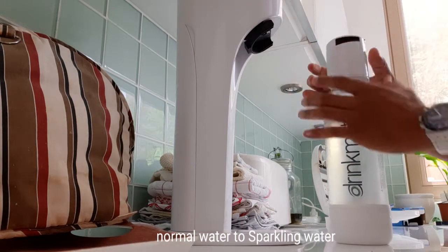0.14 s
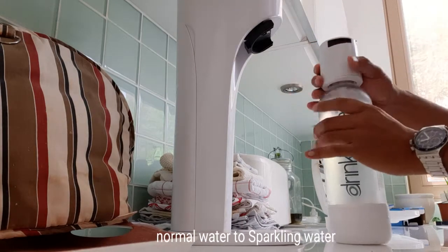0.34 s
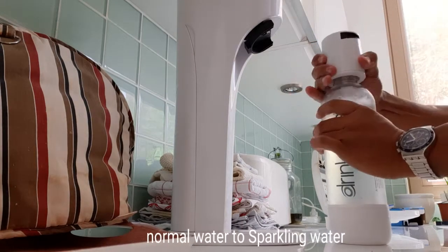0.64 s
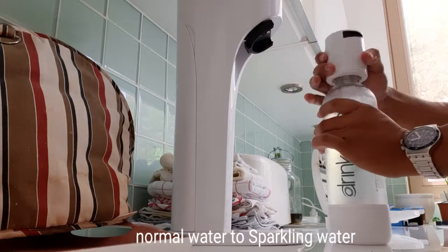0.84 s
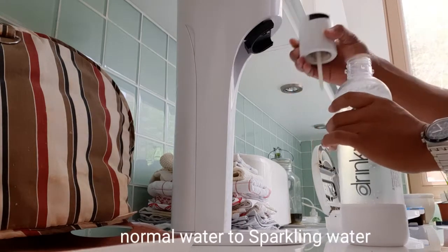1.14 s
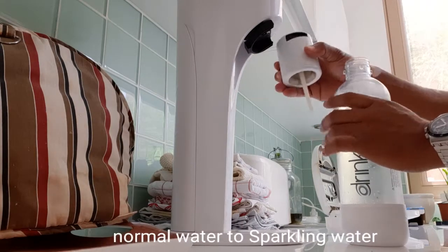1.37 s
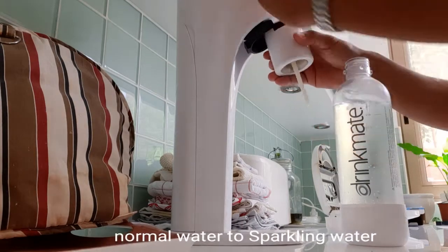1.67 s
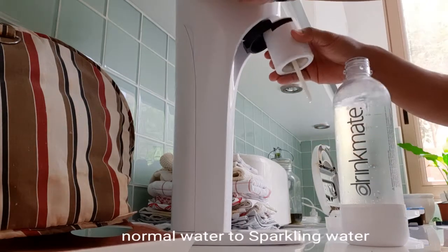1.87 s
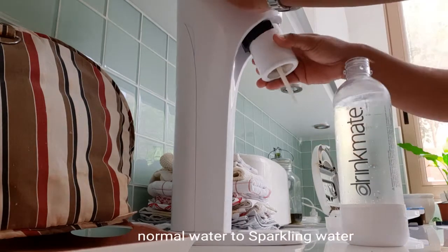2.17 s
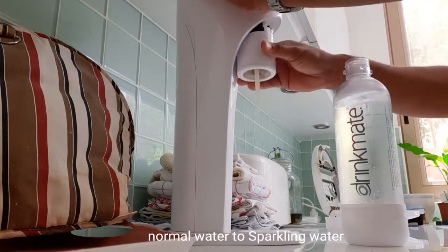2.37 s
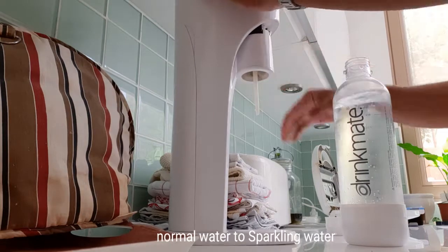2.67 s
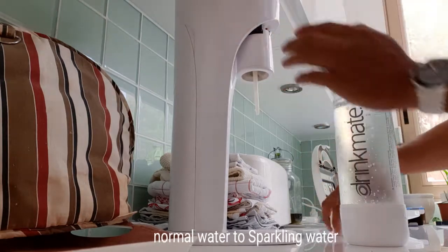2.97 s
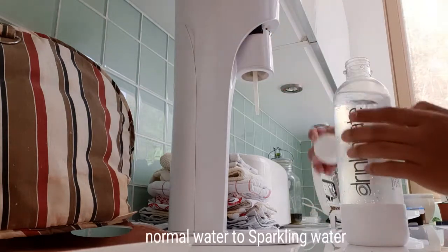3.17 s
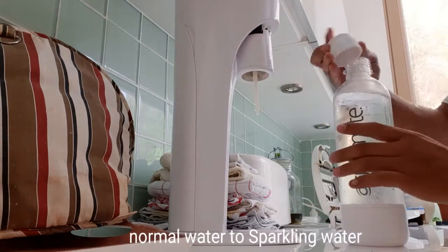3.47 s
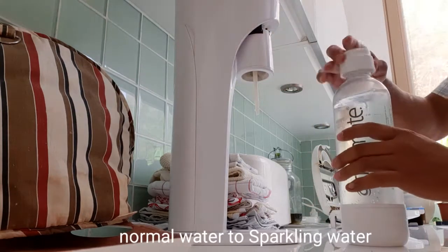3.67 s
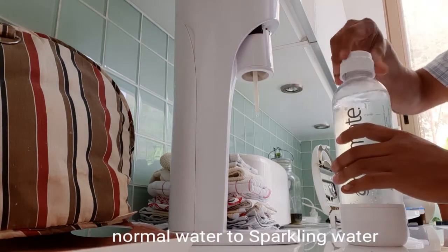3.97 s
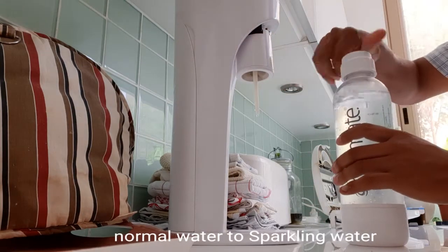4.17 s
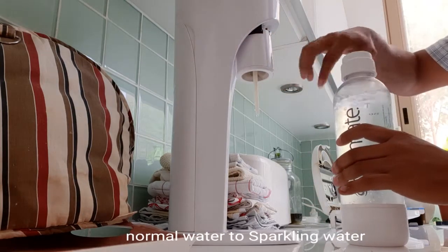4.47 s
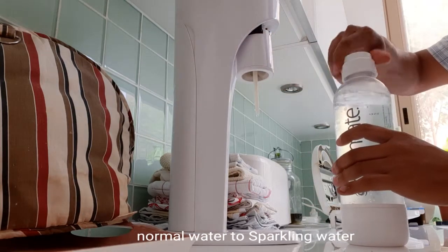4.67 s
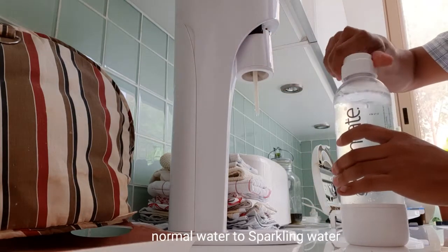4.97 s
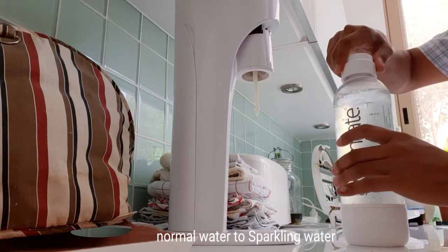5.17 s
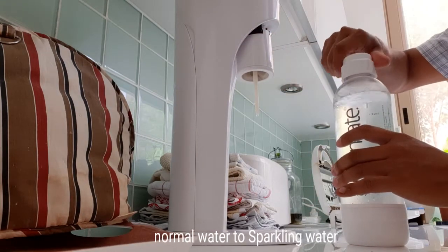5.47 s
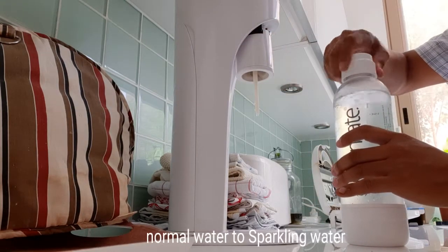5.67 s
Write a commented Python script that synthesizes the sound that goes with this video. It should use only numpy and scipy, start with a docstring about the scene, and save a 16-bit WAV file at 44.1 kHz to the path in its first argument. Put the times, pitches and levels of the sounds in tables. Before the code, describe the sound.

A bottle is uncoupled from a soda maker: fading hiss, light clicks, tiny burst of gas. Plastic taps and a gritty slide lead to two hard clacks with a short hollow boom. A hand softly brushes the bottle, then the cap clatters on and tightens in repeated rasping, clicking twists, with dull thumps and faint fizz ticks. Close pickup, lively hard-walled kitchen echo, low quiet room murmur.

```python
"""A soda maker in a tiled kitchen: first the hiss of vented gas (coloured noise) dies away.
The plastic infuser head knocks (short noise bursts ringing resonances) and leaves the bottle with a puff.
Fingers shift, then the head slides into its mount (gritty noise) and latches with two loud clacks.
A hand brushes the bottle; a cap rattles onto the neck, whose hollow note falls, and is screwed down
in short turns while the bottle thumps on the counter. Bubbles tick; a low murmur and echo surround all."""
import sys
import numpy as np
from scipy import signal
from scipy.fft import rfft, irfft
from scipy.io import wavfile
from scipy.ndimage import uniform_filter1d

SR = 44100
rng = np.random.default_rng(int(sys.argv[2]) if len(sys.argv) > 2 else 0)


def unload_audio(sound):
    """Save the sound as a 16-bit wav file, at the path given as the first command line argument."""
    columns = np.transpose(np.atleast_2d(sound))
    # keep every value between -1 and 1, then stretch to whole-number steps
    steps = np.round(np.clip(columns, -1, 1) * 32767)
    wavfile.write(sys.argv[1], SR, steps.astype(np.int16))


N = 256652  # length in samples
TAPS = 8192  # length of one short sound in samples

# steady murmur of the house: pitch_hz, level_db
AMBIENCE_COLOUR = [(15, -47.5), (25, -22.5), (64, -17.5), (82, -9), (127, -1.5), (180, -12.5), (206, -20.5),
                   (354, -9), (427, -18), (560, -10.5), (714, -16), (1190, -29.5), (1290, -27), (3340, -43),
                   (16000, -39)]
# how alike its two channels are: pitch_hz, likeness (-1 to 1)
AMBIENCE_SAME = [(60, 1), (180, 0.69), (550, 0.8), (1650, -0.5), (4970, -0.54), (15000, -0.32)]
# its left-right difference: pitch_hz, left_over_right_db
AMBIENCE_BALANCE = [(60, -22), (180, -6), (550, -6), (1650, -4), (4970, -3), (15000, -1)]
AMBIENCE_DB = -53

# time for the kitchen's echo to fall by 60 dB: pitch_hz, fall_time_s
KITCHEN_T60 = [(100, 0.5), (260, 1), (700, 0.75), (1800, 0.5665), (4800, 0.67), (13000, 0.41)]
# strength of the echo: pitch_hz, level_db
KITCHEN_DB = [(100, -6.5), (300, -5.5), (800, -3.5), (2000, -6), (5000, -2.5), (13000, -6.5)]

# soft blows that reach the counter: start_s, level_db, pitch_hz
THUMPS = [(.148, -35.5, 121), (0.251, -39.5, 98.5), (.296, -43, 85), (0.568, -22, 150), (0.577, -20, 134.4),
          (1.027, -28, 121), (1.519, -30.5, 112), (1.683, -24, 159), (1.74, -43, 87), (1.959, -36.5, 138),
          (2.028, -31.5, 124), (2.142, -43, 140), (2.348, -26.5, 118), (2.548, -33, 113), (2.939, -46, 130),
          (3.656, -32, 130), (3.877, -24, 117), (4.016, -27, 137), (4.095, -26.5, 106),
          (4.16, -25.5, 114.5), (4.348, -25.5, 109.5), (4.637, -31, 110), (4.706, -32, 108),
          (4.912, -28, 109), (4.969, -34, 119.6), (5.181, -33.5, 142), (5.239, -33, 115),
          (5.668, -34.5, 118)]
THUMP_DECAY_S = 0.013

# bubbles bursting at the neck: start_s, level_db
BUBBLES = [(2.616, -50), (2.831, -55), (2.974, -53.5), (3.865, -47.5), (4.223, -47), (4.448, -50.5),
           (4.867, -51.5), (5.086, -51), (5.203, -39.5), (5.332, -48), (5.496, -48), (5.572, -49)]

# fingers shifting on the plastic: start_s, hold_s, level_db
GRIPS = [(.75, 0.12, -63), (1.05, 0.0028, -45), (1.16, .02, -52.5), (1.4, 0.041, -67), (2.95, 0.034, -69)]
# tone of the fingers: pitch_hz, level_db
FINGERS_COLOUR = [(240, -52), (400, -15), (444, 6), (531, -7.5), (1120, -12), (1400, -14.5), (2280, -17),
                  (3410, -19), (14000, -34.5)]

# pushes of the head along its mount: start_s, hold_s, level_db
SLIDES = [(1.665, 0.024, -38), (1.8, 0.022, -50), (2.01, 0.12, -37.5)]
# tone of the slide: pitch_hz, level_db
SLIDE_COLOUR = [(88, -25), (150, -6), (201, -9.5), (649, -2), (871, -13), (1420, -13), (2060, -24.5),
                (3920, -32.5), (4860, -29.5), (11900, -36), (16000, -39)]
# the mount's thin rasp, its level relative to the slide
SQUEAK_HZ, SQUEAK_WIDTH_HZ, SQUEAK_DB = 3900, 200, -18.5

# strokes of the cap on the thread: start_s, hold_s, level_db
TURNS = [(3.605, 0.13, -49.5), (3.89, 0.013, -45.5), (4.02, 0.13, -48), (4.37, 0.025, -48),
         (4.6, .11, -50.5), (4.905, 0.074, -52), (5.15, 0.092, -47.5), (5.44, 0.037, -50),
         (5.68, 0.096, -55.5)]
# tone of the thread: pitch_hz, level_db
THREAD_COLOUR = [(240, -98), (400, -2.5), (935, -4.5), (1270, -15), (1440, -9), (2050, -13), (2930, -19),
                 (3580, -21.5), (4310, -19), (4800, -40), (7400, -29.5), (8240, -25), (9760, -33.5),
                 (13700, -24.5), (16000, -61)]
TURN_TIGHTENS_DB_PER_S = 35  # each turn grows louder while it holds

# a hand brushing along the bottle: start_s, hold_s, level_db
BRUSHES = [(3.39, 0.178, -70.5)]
# tone of the brushing: pitch_hz, level_db
BRUSH_COLOUR = [(880, -23), (1500, -6), (1680, -2), (2620, -12), (3640, -8.5), (5950, -10.5), (15000, -28)]

# tone of gas leaving the relief valve: pitch_hz, level_db
VENT_COLOUR = [(530, -5.5), (900, 0.5), (1110, -5.5), (1560, -5), (1660, 0.5), (2080, 7), (2970, -3),
               (3760, 4.5), (4970, 0.5), (7860, -2.5), (10200, -10.5), (11600, -6), (13000, -29)]
VENT_DB, VENT_FADE_DB_PER_S = -42, 105  # dies away as the pressure drops
# spurts of the last pressure as the seal lets go: start_s, hold_s, level_db
SPURTS = [(.553, .001, -43), (.568, 0.0029, -21.5), (.58, 0.008, -20)]
# tone of the puff: pitch_hz, level_db
PUFF_COLOUR = [(120, -33), (200, -13), (465, -1.5), (722, -1), (867, -8.5), (1420, -7.5), (1680, -17),
               (1940, -6), (3190, -13.5), (4600, -13.5), (5330, -14), (12400, -12.5), (16000, -15)]

# pushes of the cap that sound the air in the neck: start_s, hold_s, level_db
NECK_PUSHES = [(3.605, 0.0078, -27), (3.662, 0.048, -26), (3.76, .035, -42), (3.898, 0.0015, -31.5)]
# the air in the neck drops in pitch as the cap comes down over it
NECK_OPEN_HZ, NECK_SHUT_HZ = 447.7, 314.3
CAP_LANDS_S, CAP_CLOSING_S, CLOSING_POWER = 3.6, .113, 2.18

# the machine's hollow column booming as the head lands, and a thin ring as the cap seats:
# start_s, pitch_hz, level_db, fall_time_s (time to fall by 60 dB)
PINGS = [(2.153, 295, -14.5, 0.062), (2.154, 359.4, -19.5, 0.12), (4.019, 3650, -50, 0.52),
         (4.019, 3620, -41, .4), (4.019, 3680, -46, 0.53)]

# infuser head on bottle and machine: start_s, level_db, strongest_pitch_hz,
# treble_fall_db_per_octave, decay_s, left_over_right_db
HEAD_KNOCKS = [(.358, -55.5, 2500, 1.2, .005, 3), (.434, -47, 1500, 3.5, .012, 0.5),
               (.474, -36.5, 2170, 8.5, .0025, -2), (.517, -39, 2380, 1.7, .0023, -2),
               (1.002, -32.5, 3450, 9, .007, -2), (1.034, -40, 1045, 13, .007, -3),
               (1.16, -42, 1090, 11.5, .005, -3), (1.25, -39, 440, 11.5, .006, -3.5),
               (1.522, -24.5, 490, 7.5, .004, -5), (1.53, -21, 541, 8, .004, -3),
               (1.548, -34, 903, 5.5, .011, -2), (1.666, -19.5, 719, 8.5, .004, 0.5),
               (1.689, -14.5, 740, 13, .006, -6), (1.706, -34.5, 500, 2.5, .005, 4),
               (2.005, -31, 392.4, 4, .007, 5.5), (2.072, -36, 1000, 0.8, .0054, -0.5),
               (2.146, -10, 593, 4, .0035, 1), (2.152, -10.5, 670, 7, .0027, -10.5),
               (2.342, -9.5, 1160, 5.5, .003, -3), (2.55, -37, 380, 5.5, .004, 1)]
# what the head and the machine ring with: pitch_hz, width_hz, level_db (over the plain click)
HEAD_MODES = [(205, 40, 12), (305, 50, 15), (355, 30, 15), (425, 40, 11), (733, 22, 7), (850, 40, 3),
              (1044, 50, 10), (1137, 50, 8), (1450, 80, 7), (1620, 55, 9), (1989, 45, 8), (2288, 70, 7),
              (2700, 90, 5), (3068, 90, 8), (3524, 55, 7), (3864, 50, 6), (4310, 70, 4)]
# cap on the bottle neck and its thread: start_s, level_db, strongest_pitch_hz,
# treble_fall_db_per_octave, decay_s, left_over_right_db
CAP_CLICKS = [(3.602, -19, 1630, 12.5, 0.0023, -9), (3.626, -22, 1600, 10, 0.016, 13.5),
              (3.641, -21.5, 1400, 8, 0.0061, -5.5), (3.656, -23, 1200, 11, .004, -13),
              (3.677, -19, 1300, 12, 0.0048, 2.5), (3.703, -15.5, 1300, 9.5, 0.011, -3),
              (3.88, -30.5, 1120, 9, 0.0041, -2), (3.892, -23, 930, 13, 0.0028, -2),
              (4.016, -17, 480, 5, 0.0016, -2.5), (4.021, -26.5, 900, 15, 0.0046, -16),
              (4.103, -23.5, 820, 7.5, .004, -6), (4.345, -34.5, 990, 9.7, 0.005, -4),
              (4.374, -23.5, 700, 10, 0.011, -3.5), (4.604, -24, 670, 8, 0.0042, -6),
              (4.636, -27, 910, 9.5, 0.0035, -3), (4.684, -26.5, 700, 8, 0.0055, -2),
              (4.696, -32, 404, 3.5, 0.0057, -3), (4.905, -27, 780, 8.5, 0.0049, -4),
              (5.14, -33, 480, 7.5, 0.0056, -6.5), (5.167, -25.5, 1295, 9, 0.0063, -3.5),
              (5.212, -21.5, 890, 10, 0.0043, -2), (5.418, -32, 453, 7.5, 0.0071, -6),
              (5.437, -31, 370, 6.5, 0.024, -5), (5.491, -33.5, 450, 3.5, 0.0051, -3.5),
              (5.664, -29.5, 636, 5, 0.0079, -2)]
# what the capped bottle rings with: pitch_hz, width_hz, level_db (over the plain click)
BOTTLE_MODES = [(578.3, 19.6, 9), (916, 20, 9), (1436, 90, 8.5), (1664, 51, 15), (1744, 84, 6),
                (2606, 310, 9.5), (2830, 50, 7.5), (3370, 94, 12), (3830, 57, 4), (4086, 59, 6),
                (6160, 81, 3.5)]
# middles of the bands in which a contact's level is set: pitch_hz
BAND_HZ = [380, 1300, 4200, 10500]
BASS_FALL_DB_PER_OCTAVE = 5  # how a contact weakens below its strongest pitch
BLOW_S = .006  # a contact's level is its rms over this time

EDGE_HZ = 15950  # upper limit of the final sound


def amp(db):
    """Decibels to gain."""
    return 10 ** (np.asarray(db) / 20)


def unit(x):
    """Scales to an rms of one."""
    return x / np.sqrt(np.mean(abs(x) ** 2) + 1e-20)


def read(points, hz):
    """Reads a curve joined by straight lines over log frequency."""
    f, value = np.transpose(points)
    return np.interp(np.log(hz + 1), np.log(f + 1), value)


def add(mix, s, sound):
    """Mixes a stereo sound in at time s."""
    part = mix[:, max(round(s * SR), 0):][:, :sound.shape[1]]
    part += sound[:, :part.shape[1]]


def sides(pan_db):
    """Left and right gains for a level difference; positive is louder on the left."""
    return amp(np.array([[.5], [-.5]]) * pan_db)


def causal(gain):
    """The minimum-phase response with this magnitude, so that its energy comes as early as it can."""
    log = np.log(np.maximum(gain, 1e-7))
    mirrored = np.r_[log, log[-2:0:-1]]
    return np.exp(np.conj(signal.hilbert(mirrored)))[:len(gain)]


def noise(colour, same, grain_db=0):
    """Coloured stereo noise, partly alike in both channels; random level steps make it crackle."""
    steps = np.repeat(rng.standard_normal(N // 64 + 1), 64)[:N]
    a, b = rfft(rng.standard_normal((2, N)) * amp(grain_db * steps))
    same = np.clip(same, -1, 1)
    pair = np.array([a, same * a + np.sqrt(1 - same ** 2) * b])
    tone = amp(read(colour, np.fft.rfftfreq(N, 1 / SR)))
    return unit(irfft(pair * tone, N))


def strokes(rows, attack_s, release_db_per_s, swell_db_per_s=0):
    """Gain over time: each stroke rises to its start time, holds or swells, then dies away."""
    gain = np.zeros(N)
    for s, hold, db in rows:
        t = np.arange(N) / SR - s
        onset = np.clip(1 + t / attack_s, 0, 1) ** 2
        swell_db = swell_db_per_s * np.clip(t, 0, hold)
        release_db = release_db_per_s * np.clip(t - hold, 0, 1)
        gain = np.maximum(gain, onset * amp(db + swell_db - release_db))
    return gain


def ambience():
    """The low steady murmur of the house: coloured noise with its own left-right balance."""
    hz = np.fft.rfftfreq(N, 1 / SR)
    air = noise(AMBIENCE_COLOUR, same=read(AMBIENCE_SAME, hz))
    balanced = irfft(rfft(air) * sides(read(AMBIENCE_BALANCE, hz)), N)
    return amp(AMBIENCE_DB) * unit(balanced)


def kitchen(x, early_db=4, early_s=0.013, gap_s=0.0033, same_hz=520):
    """Dense reflections from counter and tiles, strongest at first, alike in both channels in the bass."""
    t = np.arange(SR) / SR
    taps = rng.standard_normal((2, SR)) * (rng.random((2, SR)) < .2) * (t > gap_s)
    early = 1 + amp(early_db) * np.exp(-t / early_s)
    hz, when, z = signal.stft(taps * early, SR, nperseg=256)
    same = np.exp(-(hz / same_hz) ** 2)[:, None]
    z[1] = same * z[0] + np.sqrt(1 - same ** 2) * z[1]
    z = z * amp(-60 * when / read(KITCHEN_T60, hz)[:, None])
    z = z / np.sqrt(np.mean(abs(z) ** 2, (0, 2)))[:, None]
    coloured = z * amp(read(KITCHEN_DB, hz))[:, None]
    plain, tail = (signal.istft(v, SR, nperseg=256)[1] for v in (z, coloured))
    return signal.fftconvolve(x, tail / np.linalg.norm(plain[0]), axes=1)[:, :N]


def thumps(rise=0.005, pan_db=-8, stiffen=0.44, stiff_s=0.0013, sway_hz=72, sway_db=-10):
    """The counter swings for a few slow cycles under each push, over a weaker, deeper sway."""
    out, t = np.zeros((2, N)), np.arange(TAPS) / SR
    swing = (1 - np.exp(-(t / rise) ** 2)) * np.exp(-t / THUMP_DECAY_S)
    sway = amp(sway_db) * np.sin(2 * np.pi * sway_hz * t)
    for s, db, hz in THUMPS:
        # stiffer, so higher in pitch, while the hand still presses
        turns = np.cumsum(hz * (1 + stiffen * np.exp(-t / stiff_s))) / SR
        wave = np.sin(2 * np.pi * turns) + sway
        add(out, s + rise, amp(db) * swing / swing.max() * wave * sides(pan_db))
    return out


def bubbles(decay=0.0015, low_hz=9500):
    """Tiny dying bursts of treble noise, drawn separately for each channel."""
    out, t = np.zeros((2, N)), np.arange(TAPS) / SR
    bright = signal.butter(2, low_hz, "high", fs=SR, output="sos")
    for s, db in BUBBLES:
        burst = rng.standard_normal((2, TAPS)) * np.exp(-t / decay)
        add(out, s, amp(db) * 2 * signal.sosfilt(bright, burst))
    return out


def rasp(hz, width_hz):
    """Stick-slip grains ringing one resonance of the plastic."""
    f = np.fft.rfftfreq(N, 1 / SR)
    flat = [(1, 0), (SR, 0)]
    grains = rfft(noise(flat, same=.3, grain_db=5))
    return unit(irfft(grains / (1 + 2j * (f - hz) / width_hz), N))


def rubbing():
    """Gritty friction of fingers, of the head in its mount and of the cap on its thread; a hand's soft brush."""
    grip = strokes(GRIPS, attack_s=0.09, release_db_per_s=148.5)
    push = strokes(SLIDES, attack_s=.05, release_db_per_s=75)
    turn = strokes(TURNS, attack_s=0.034, release_db_per_s=330, swell_db_per_s=TURN_TIGHTENS_DB_PER_S)
    sweep = strokes(BRUSHES, attack_s=0.12, release_db_per_s=200, swell_db_per_s=33)
    fingers = grip * noise(FINGERS_COLOUR, same=0.56, grain_db=-5.0) * sides(pan_db=-3)
    squeak = amp(SQUEAK_DB) * rasp(SQUEAK_HZ, SQUEAK_WIDTH_HZ)
    slide = push * (noise(SLIDE_COLOUR, same=0.76, grain_db=1.5) + squeak) * sides(pan_db=-3.5)
    thread = turn * noise(THREAD_COLOUR, same=0.15, grain_db=4.5) * sides(pan_db=-0.5)
    brush = sweep * noise(BRUSH_COLOUR, same=.2)
    return fingers + slide + thread + brush


def gas():
    """Escaping gas is coloured noise: the fading hiss of the valve and the spitting puff of the seal."""
    fade = amp(VENT_DB - VENT_FADE_DB_PER_S * np.arange(N) / SR)
    vent = fade * noise(VENT_COLOUR, same=0.18)
    spurt = strokes(SPURTS, attack_s=0.0073, release_db_per_s=1619)
    puff = spurt * noise(PUFF_COLOUR, same=0.11) * sides(pan_db=-2.5)
    return vent + puff


def cavity(rough=0.38, width_hz=55, pan_db=-2):
    """The hollow note of the bottle neck falls as the rattling cap shuts its opening."""
    shut = np.clip((np.arange(N) / SR - CAP_LANDS_S) / CAP_CLOSING_S, 0, 1) ** CLOSING_POWER
    turns = np.cumsum(NECK_OPEN_HZ + (NECK_SHUT_HZ - NECK_OPEN_HZ) * shut) / SR
    slow = signal.butter(2, width_hz, fs=SR, output="sos")
    # slow random changes in the strength and phase of the note
    jostle = unit(signal.sosfilt(slow, rng.standard_normal(N) + 1j * rng.standard_normal(N)))
    note = unit(((1 + rough * jostle) * np.exp(2j * np.pi * turns)).real)
    push = strokes(NECK_PUSHES, attack_s=.005, release_db_per_s=394)
    return note * push * sides(pan_db)


def pings(pan_db=-3):
    """A few lightly damped modes ring as dying sine waves; those close in pitch beat together."""
    out, t = np.zeros((2, N)), np.arange(SR) / SR
    for s, hz, db, t60 in PINGS:
        decay = np.exp(-np.log(1000) * t / t60)
        add(out, s, amp(db) * decay * np.sin(2 * np.pi * hz * t) * sides(pan_db))
    return out


def knocks(rows, modes, spread, lag_s, low_hz, top_hz, rise_s, grip_db, damping):
    """Each contact is a brief chatter ringing the modes; its row sets its strongest pitch and treble fall."""
    out, t, hz = np.zeros((2, N)), np.arange(TAPS) / SR, np.fft.rfftfreq(TAPS, 1 / SR)
    # the holding hand damps the modes, widening the higher ones more
    rings = np.array([amp(db) / (1 + 2j * (hz - f) / (width + damping * f)) for f, width, db in modes])
    # small plastic parts give off little bass and damp the highest treble
    radiation = causal(1 / np.sqrt(1 + (low_hz / (hz + 1)) ** 6 + (hz / top_hz) ** 6))
    bands = np.array([read(list(zip(BAND_HZ, pick)), hz) for pick in np.eye(len(BAND_HZ))])
    for s, db, centre_hz, fall, decay, pan_db in rows:
        octaves = np.log2(np.array(BAND_HZ) / centre_hz)
        band_db = db + np.minimum(BASS_FALL_DB_PER_OCTAVE * octaves, -fall * octaves)
        # each grip favours other modes
        body = radiation * (1 + amp(grip_db * rng.standard_normal(len(modes))) @ rings)
        # the decay time is kept between 0.0005 and 0.02 s
        contact = (1 - np.exp(-t / rise_s)) * np.exp(-t / np.clip(decay, .0005, .02))
        chatter = rfft(rng.standard_normal((2, TAPS)) * contact)
        # even out the broad tone of each chatter
        both, apart = (c / causal(np.sqrt(uniform_filter1d(abs(c) ** 2, size=240))) for c in chatter)
        # long waves reach both microphones alike
        apart = apart * spread * hz ** 2 / (hz ** 2 + 550 ** 2)
        right_delay = np.exp(-2j * np.pi * hz * lag_s)
        pair = np.array([both + apart, (both - apart) * right_delay]) * body
        # bring each band to its wanted level
        held_db = 10 * np.log10(bands @ np.mean(abs(pair) ** 2, 0))
        ring = irfft(pair * causal(amp((band_db - held_db) @ bands)))
        add(out, s + rise_s, ring * np.sqrt(TAPS * SR * BLOW_S / 2) * sides(pan_db))
    return out


def scene():
    """All sources, close to the microphone, with the kitchen around them."""
    head = knocks(HEAD_KNOCKS, HEAD_MODES, spread=0.9, lag_s=0, low_hz=216, top_hz=11100,
                  rise_s=.0008, grip_db=1.5, damping=.025)
    cap = knocks(CAP_CLICKS, BOTTLE_MODES, spread=0.83, lag_s=0.00013, low_hz=300, top_hz=12000,
                 rise_s=.0009, grip_db=3.5, damping=0.0058)
    near = head + cap + pings() + thumps() + bubbles() + cavity() + gas() + rubbing()
    return near + kitchen(near) + ambience()


def record(dry):
    """The microphone's bass cut, the full-scale limit, then the band limit."""
    bass_cut = signal.butter(4, 48, "high", fs=SR, output="sos")
    limited = np.clip(signal.sosfilt(bass_cut, dry), -1, 1)
    band_limit = signal.firwin(511, EDGE_HZ, window=("kaiser", 9), fs=SR)
    return signal.oaconvolve(limited, band_limit[None], "same")


dry = scene()
out = record(dry)
unload_audio(out)
```